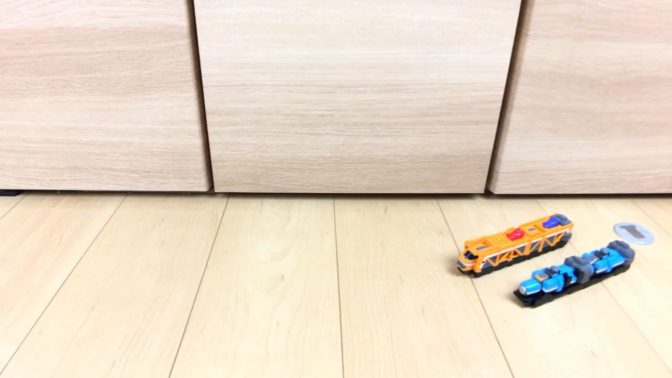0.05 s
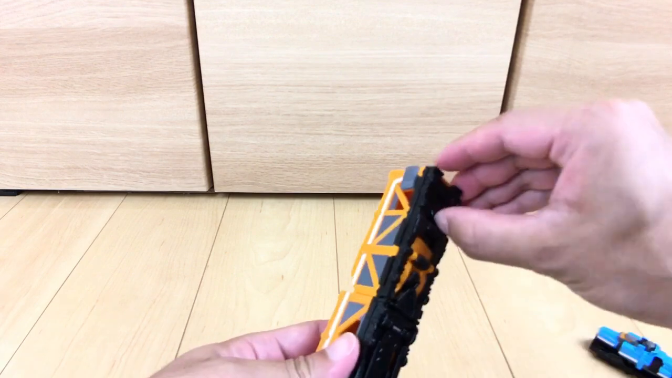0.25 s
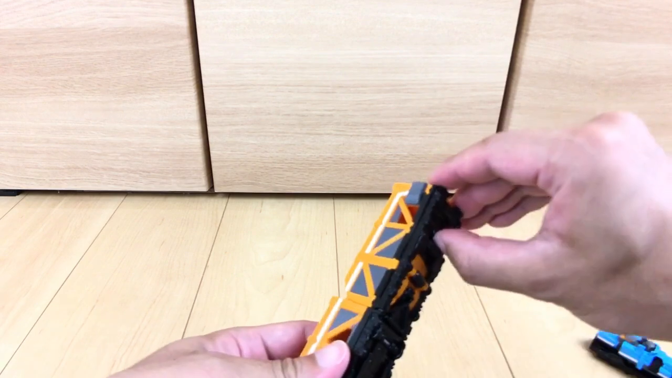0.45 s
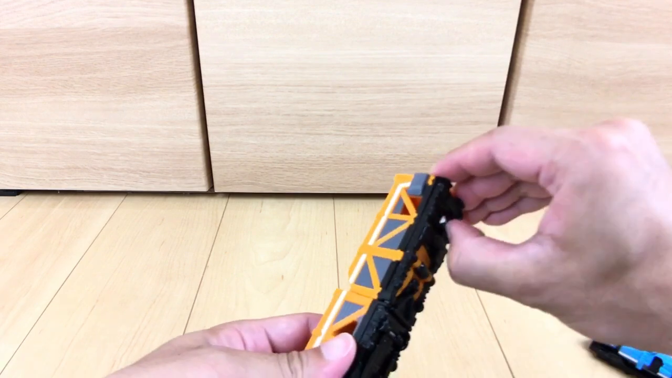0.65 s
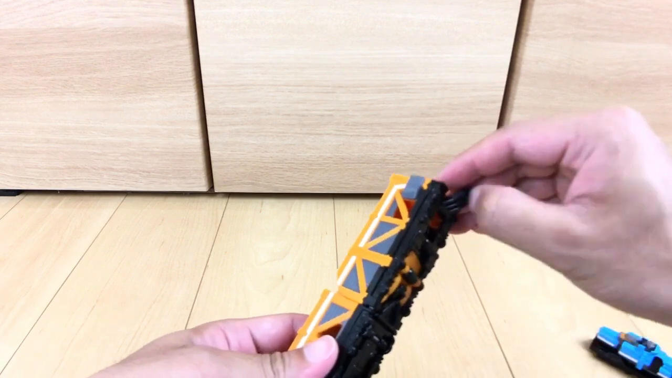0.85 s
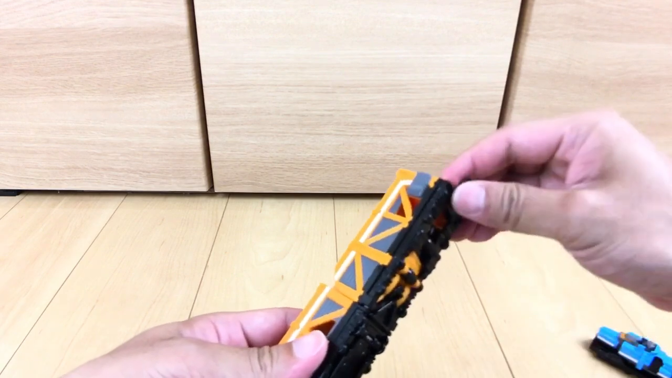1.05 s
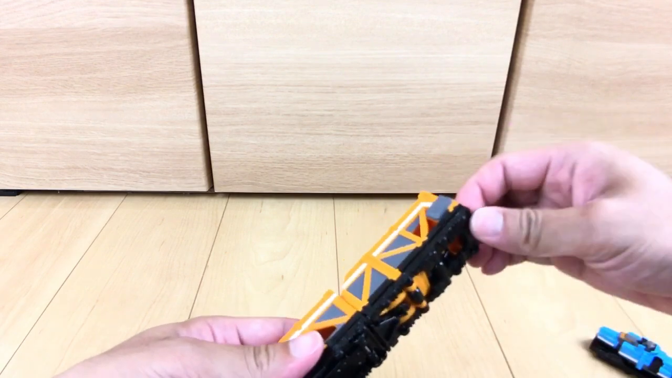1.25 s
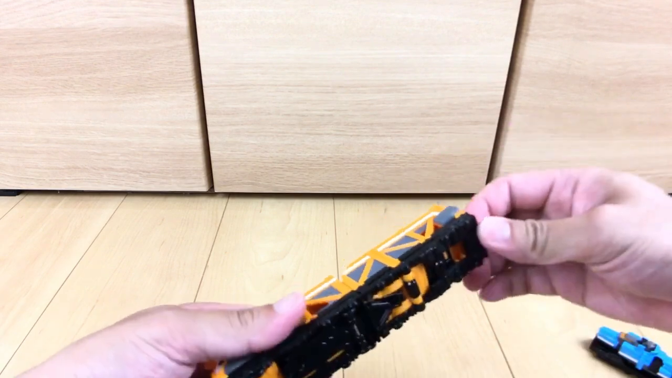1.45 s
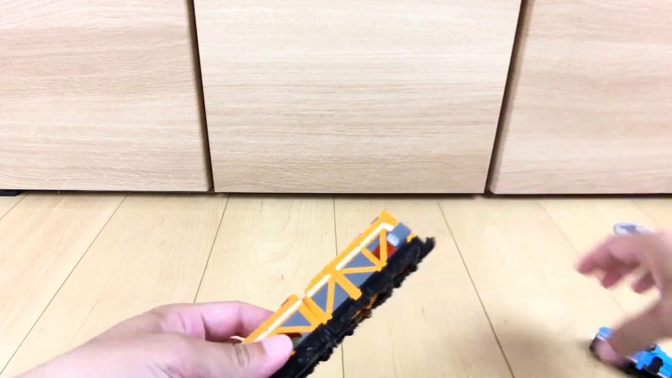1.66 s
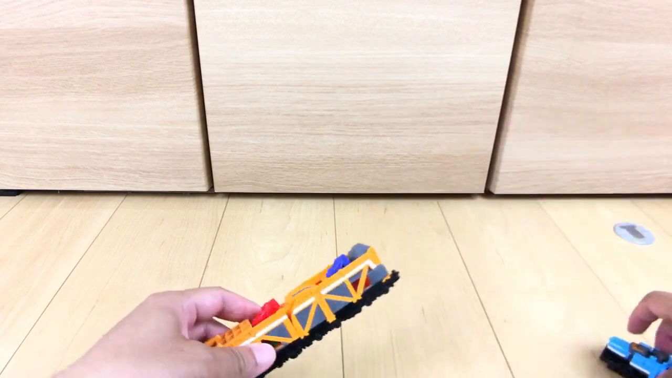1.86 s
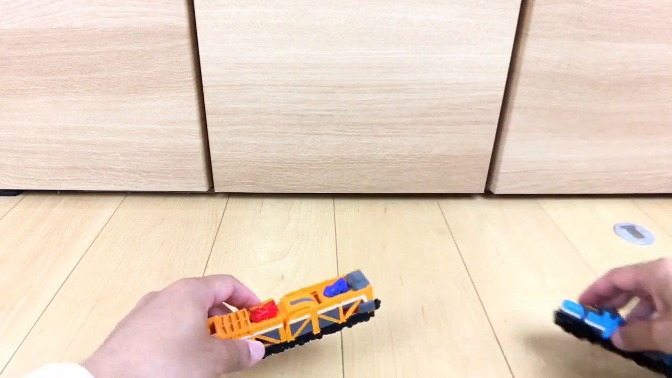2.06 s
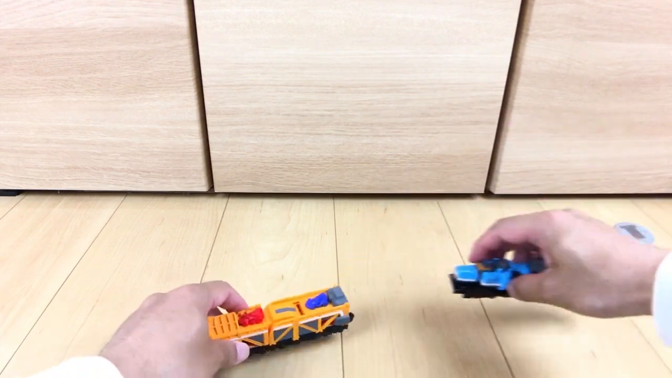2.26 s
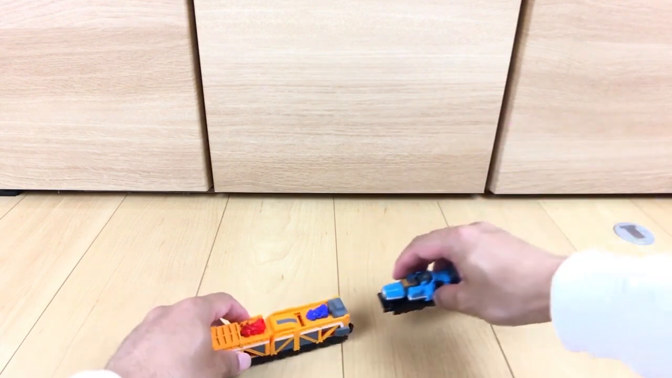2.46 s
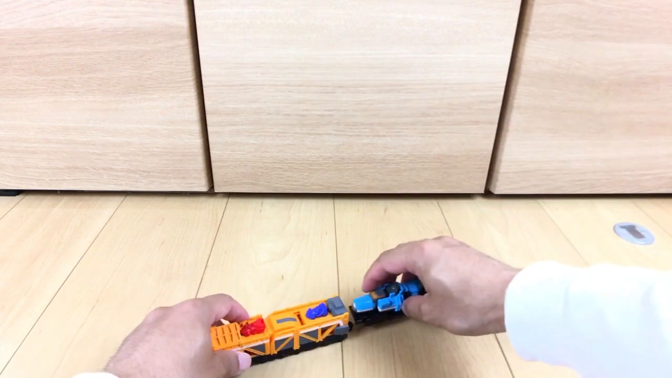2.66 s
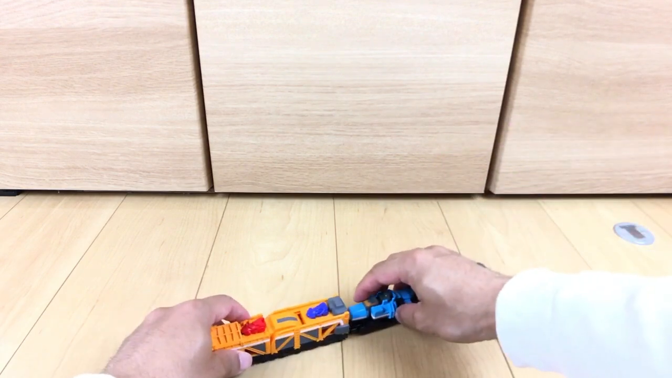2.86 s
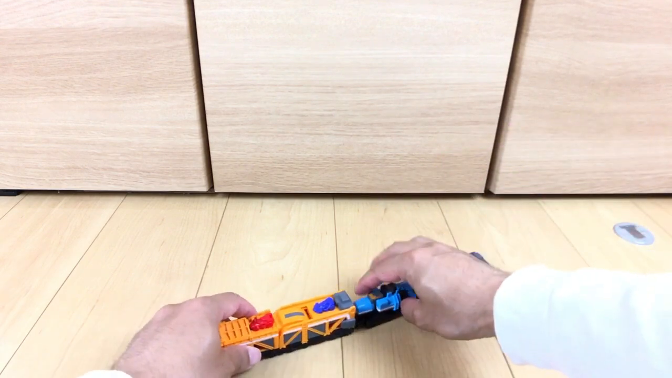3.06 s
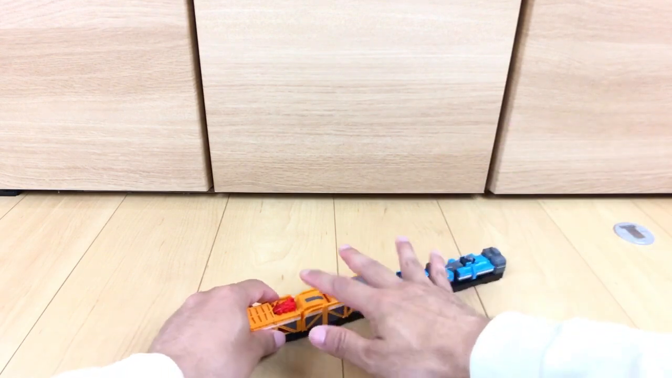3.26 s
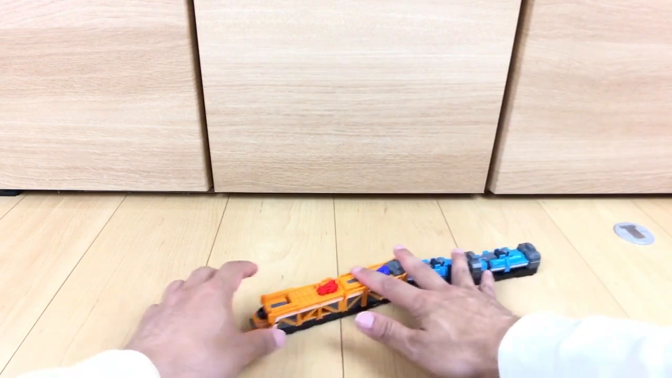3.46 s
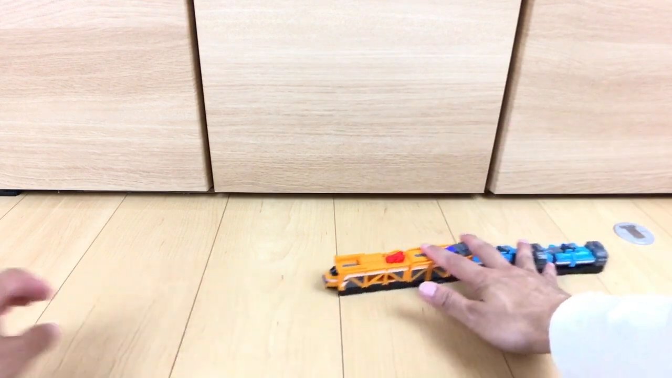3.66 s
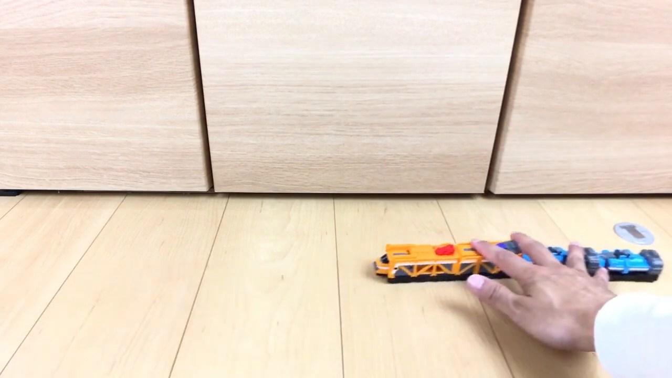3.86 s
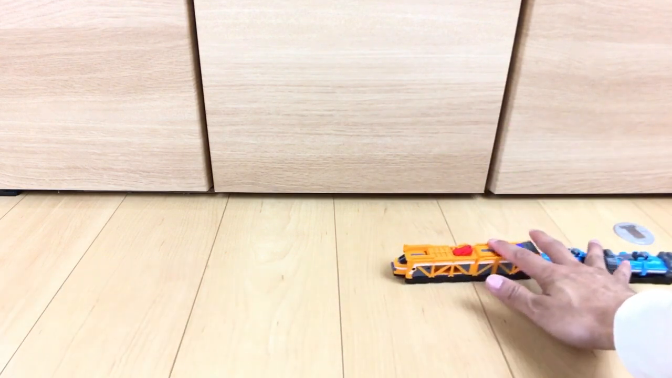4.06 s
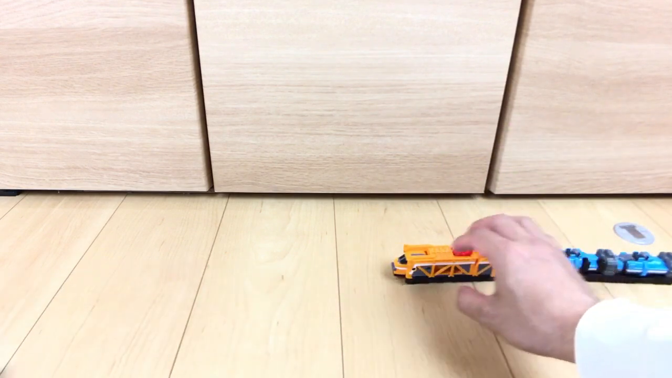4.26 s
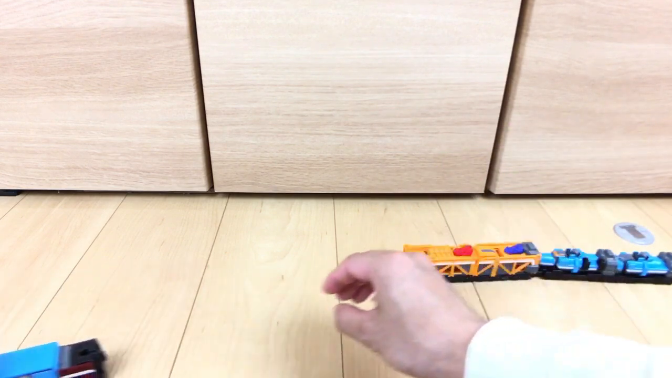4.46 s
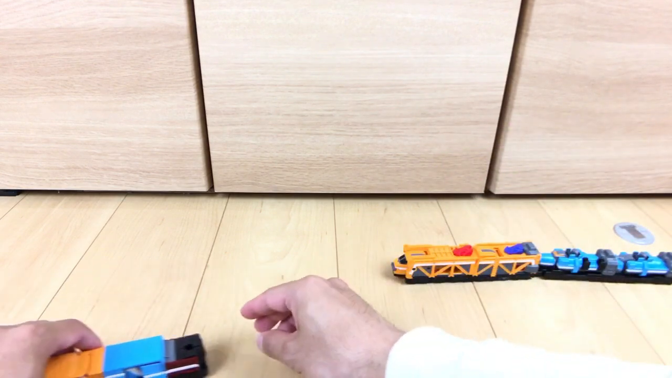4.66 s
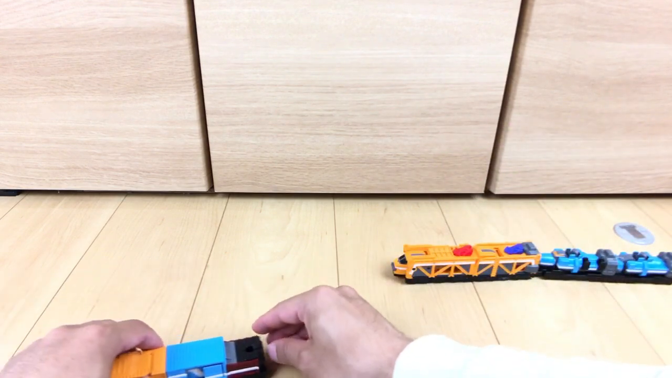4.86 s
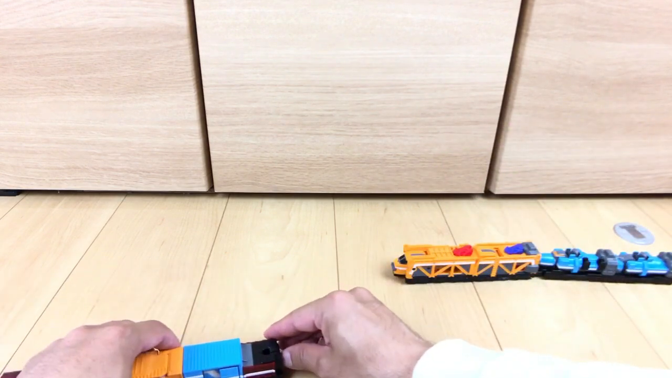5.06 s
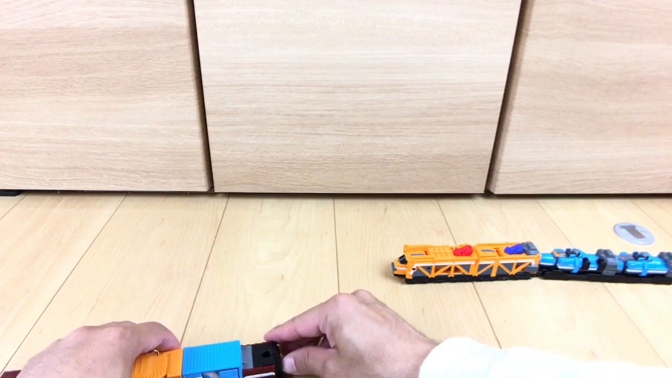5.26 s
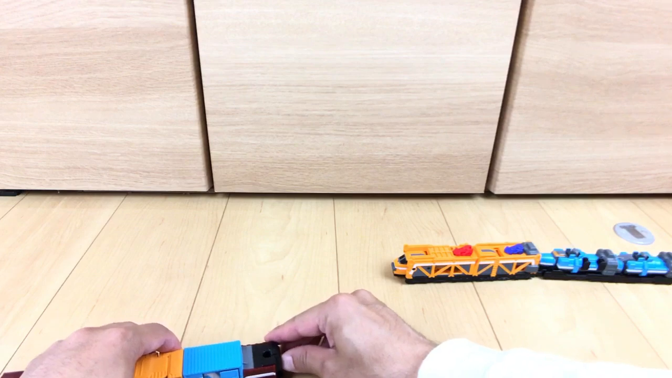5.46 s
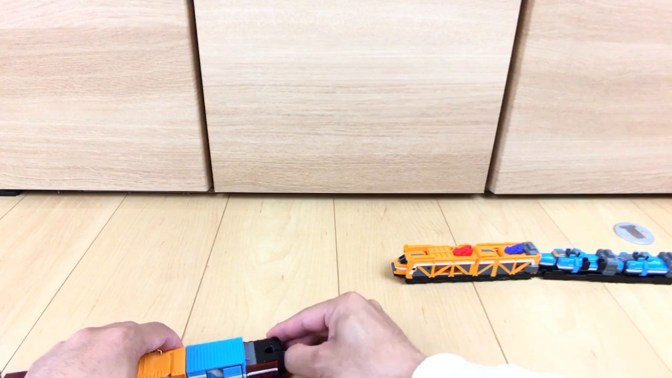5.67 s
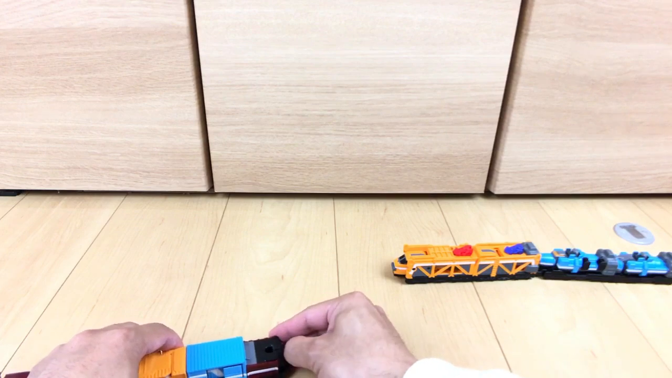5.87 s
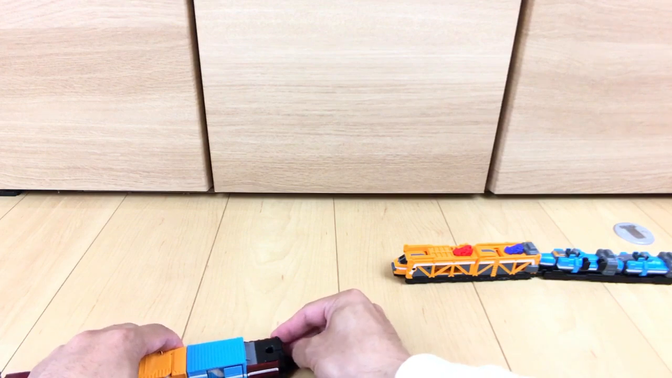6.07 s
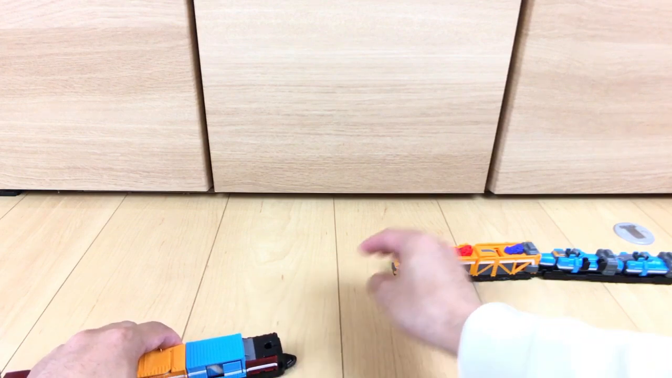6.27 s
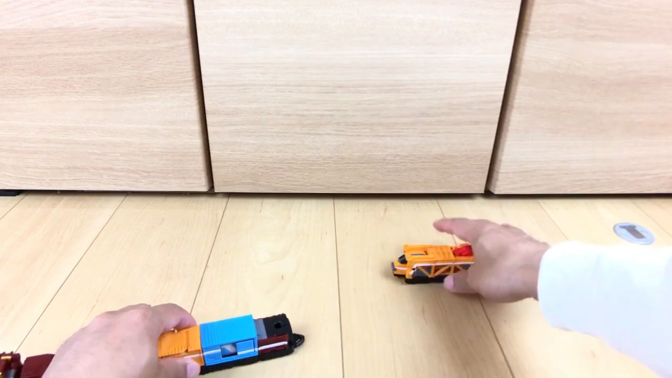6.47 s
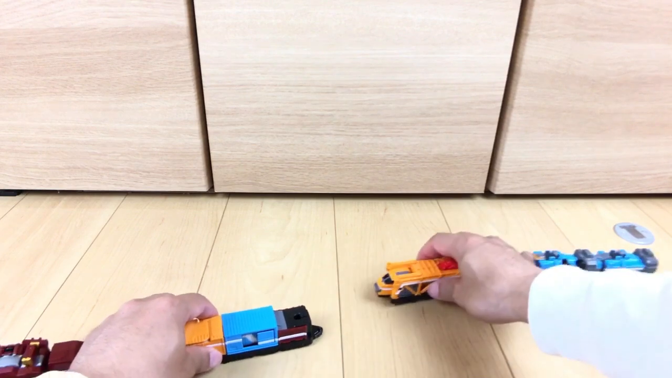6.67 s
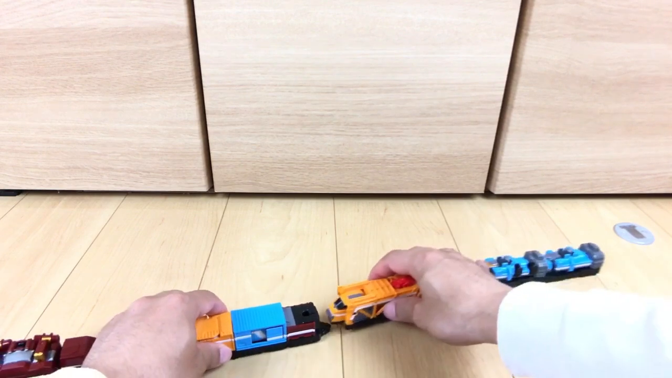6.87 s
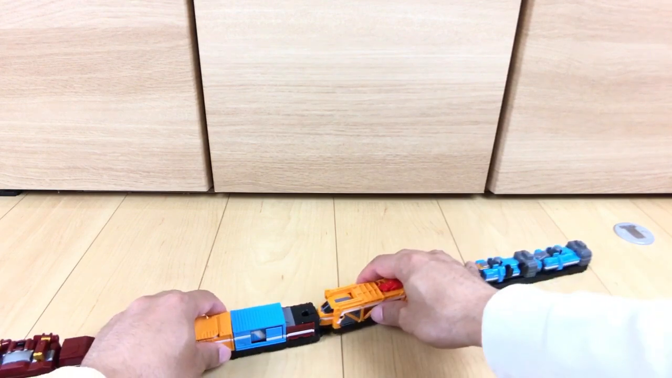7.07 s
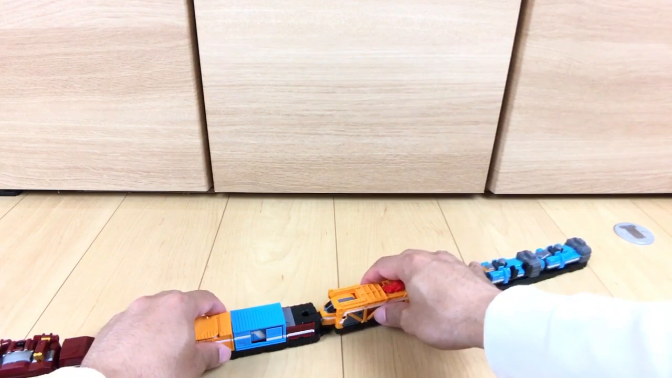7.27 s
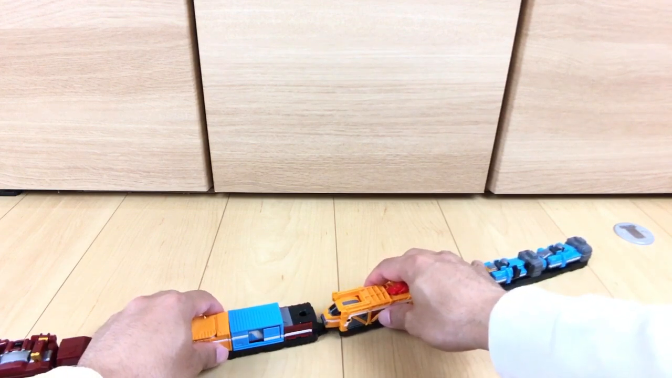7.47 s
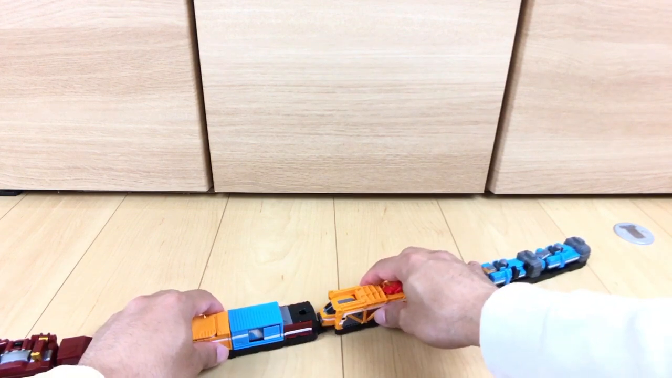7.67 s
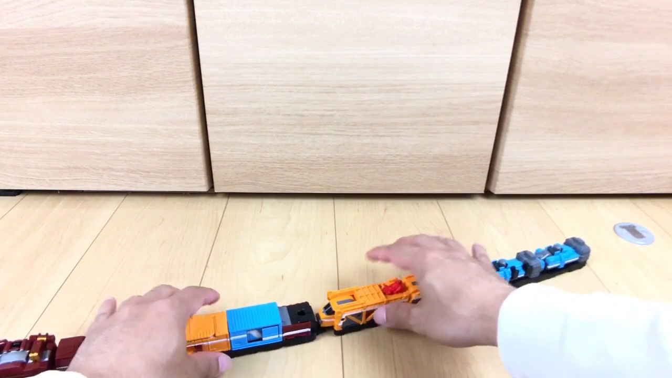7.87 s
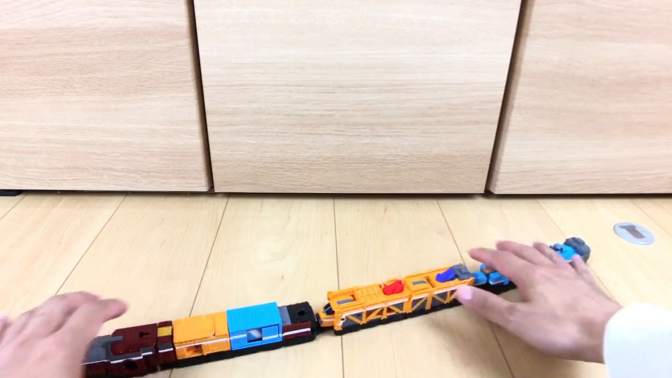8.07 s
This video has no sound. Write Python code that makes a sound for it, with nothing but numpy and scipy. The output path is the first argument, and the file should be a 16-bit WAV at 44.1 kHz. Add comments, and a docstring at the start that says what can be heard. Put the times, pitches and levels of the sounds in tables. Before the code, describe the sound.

Sharp plastic clicks and clacks of toy train cars being coupled, with hard wheels rolling and rattling over floorboards in a small room.

```python
"""A small room with a wooden floor: plastic toy train cars are handled close to a mono microphone.
A stiff coupling hook ticks as it is folded out, a car is set down and bounces, couplings snap together.
Pushed along, the hard wheels rumble in the floorboards, jolt over joints and rattle the hollow shells.
Plastic creaks under the fingers, pressed wheels judder, and the dropped engine clonks."""
import sys
import numpy as np
from scipy import signal
from scipy.fft import rfft, irfft
from scipy.io import wavfile

SR = 44100
rng = np.random.default_rng(int(sys.argv[2]) if len(sys.argv) > 2 else 0)


def generate_wav(signal):
    """Clip the signal to [-1, 1] and save it as 16-bit WAV at the path in sys.argv[1]."""
    frames = np.transpose(np.atleast_2d(signal))
    scaled = np.clip(frames, -1, 1) * 32767
    pcm = np.round(scaled).astype(np.int16)
    wavfile.write(sys.argv[1], SR, pcm)


N = 358091

# spectrum of a shell's crack: freq_hz, level_db
CRACK_SPECTRUM = [(1500, -32), (2300, -8.5), (3100, 0.5), (4400, -2), (5500, -3), (6500, -6.5), (7800, -23),
                  (10000, -17.5), (12000, -34)]
# spectrum of hard edges snapping: freq_hz, level_db
SNAP_SPECTRUM = [(7000, -48), (9000, -16.5), (10800, -11), (12000, 1), (13300, 1.5), (14500, 6.5),
                 (15600, -12), (17000, -33.5)]
# spectrum of a light wagon's rattle: freq_hz, level_db
WAGON_SPECTRUM = [(100, -65), (500, -40.5), (800, -27), (1100, -21.5), (1800, -18.5), (2500, -10.5),
                  (3400, -10), (4400, 0.5), (5100, -11), (5800, -14.5), (7800, -32.5), (10500, -30),
                  (12000, -21), (13900, -18.5), (16000, -31.5)]
# plastic shell modes: freq_hz, level_db
SHELL_MODES = [(2790, -7), (3280, -5.5), (3650, -1), (3990, -2), (4290, 1.5), (4490, 3.5), (4900, -43),
               (5430, -1), (6100, -14.5)]
# hollow body modes: freq_hz, level_db, t60_s
BODY_MODES = [(535, -28.5, .16), (581, -1.5, 0.065), (950, -14, 0.055), (1050, -9.5, 0.069),
              (1153, -10.5, 0.037)]
# mid-floor board resonances: freq_hz, width_hz, level_db
BOARD_MIDDLE = [(118.4, 50, -7), (203, 38, 1.5), (275, 98, 2), (331.3, 50, 4.5), (433, 65, -10.5),
                (624, 90, -16.5)]


def undb(db):
    """Decibels to gain."""
    return 10 ** (np.asarray(db) / 20)


def unit(x):
    """Scale to rms 1."""
    return x / np.sqrt(np.mean(x ** 2))


def colour(points, size=1024):
    """Minimum-phase impulse response from (freq_hz, level_db) points."""
    hz, db = np.transpose(points)
    gain = undb(np.interp(np.log(np.fft.rfftfreq(size, 1 / SR) + 1), np.log(hz), db))
    cepstrum = irfft(np.log(gain))
    cepstrum[1:size // 2] *= 2
    cepstrum[size // 2 + 1:] = 0
    return irfft(np.exp(rfft(cepstrum)))


def through(x, response):
    """Convolve, keeping the length."""
    return signal.oaconvolve(x, response)[:len(x)]


def butter(x, hz, kind, order=2):
    """Butterworth filter."""
    return signal.sosfilt(signal.butter(order, hz, kind, fs=SR, output="sos"), x)


def resonate(x, hz, width_hz):
    """One resonance, gain 1 at its centre."""
    return signal.lfilter(*signal.iirpeak(hz, hz / width_hz, fs=SR), x)


def fade(t, t60_s):
    """Exponential decay, 60 dB down at t60_s."""
    return np.exp(-np.log(1000) * t / t60_s)


def walk(rate_hz):
    """Random wander, rms 1."""
    knots = rng.standard_normal(N // 100)
    return unit(np.interp(np.arange(N) / SR * rate_hz, np.arange(len(knots)), knots))


def add(out, start_s, sound):
    """Mix a sound in at start_s."""
    start = max(int(start_s * SR), 0)
    part = out[start:start + len(sound)]
    part += sound[:len(part)]


def early_level(x, db, window_s=.01):
    """Scale a hit so its first window_s has rms level db."""
    return x * undb(db) / np.sqrt(np.mean(x[:int(window_s * SR)] ** 2))


def modes(t, hz, db, t60_s, detune):
    """Decaying partials; sign and strength vary with where the blow lands."""
    tuning, sign, strength = rng.standard_normal((3, len(hz), 1))
    waves = np.sin(2 * np.pi * hz[:, None] * (1 + detune * tuning) * t + np.pi * (sign > 0))
    gains = undb(db[:, None] + 2.7 * strength)
    return np.sum(gains * waves * fade(t, np.reshape(t60_s, (-1, 1))), axis=0)


def chatter(t, t60_s, spread_db):
    """Loose parts collide in a dying burst of uneven impacts."""
    noise, size = rng.standard_normal((2, len(t)))
    return noise * undb(spread_db * size) * fade(t, t60_s)


def rumble(board, bump_rate_hz=900):
    """Small wheel bumps drive the floorboard's resonances."""
    bumps = (rng.random(N) < bump_rate_hz / SR) * rng.standard_normal(N) * undb(.95 * walk(45))
    wood = sum((-1) ** k * undb(db) * resonate(bumps, hz, width_hz)
               for k, (hz, width_hz, db) in enumerate(board))
    # the board radiates little deep bass and is too heavy for treble
    return unit(butter(wood, [80, 850], "bandpass"))


def rattle(spectrum, shell_modes, rate_hz, spread_db, mode_db, wheels=5):
    """Axles tap in their bearings; each wheel rings the shell in its own way."""
    out, t = np.zeros(N), np.arange(SR // 16) / SR
    for _ in range(wheels):
        size = undb(spread_db * np.minimum(rng.exponential(size=N), 4))
        load = undb(2.4 * walk(22))  # the hand's weight shifts between wheels
        taps = (rng.random(N) < rate_hz / wheels / SR) * size * load
        crack = through(chatter(t, t60_s=.03, spread_db=1.5), colour(spectrum))
        ring = modes(t, *np.transpose(shell_modes), t60_s=.045, detune=.011)
        out += through(taps, unit(crack) + undb(mode_db) * unit(ring))
    return unit(out)


def engine_rattle():
    """The heavier engine rattles densely, with a fuller midrange."""
    # tap spectrum and shell modes: freq_hz, level_db
    spectrum = [(100, -58), (450, -19), (750, -9), (1250, -9.5), (1700, -13), (2150, -12), (3500, -3),
                (4600, 0), (5500, -8.5), (7800, -25.5), (10500, -25), (12000, -16.5), (13700, -16.5),
                (16000, -28.5)]
    shell_modes = [(2104, 0.5), (2220, -10), (2820, 1), (4300, 2.5), (4490, -0.5), (5200, 1.5)]
    return rattle(spectrum, shell_modes, rate_hz=1200, spread_db=2, mode_db=-7) * undb(.46 * walk(70))


def edge_ticks(rate_hz=90):
    """Loose hard edges tick together, sparse and bright."""
    t = np.arange(SR // 30) / SR
    size = undb(4 * np.minimum(rng.exponential(size=N), 3))
    tick = through(chatter(t, t60_s=.014, spread_db=5), colour(SNAP_SPECTRUM))
    return unit(through((rng.random(N) < rate_hz / SR) * size, tick))


def roll(push, board, shell, ticks, rumble_trim_db, rattle_trim_db, tick_trim_db):
    """Rumble and rattle swell and die with one push; edge ticks stand out when it is brisk."""
    time_s, *levels_db = np.transpose(push)
    span = np.arange(max(int(time_s[0] * SR), 0), min(int(time_s[-1] * SR), N))
    rumble_db, rattle_db = (np.interp(span / SR, time_s, db) for db in levels_db)
    pivot_db, tick_db_per_db = -29.5, 1.5
    tick_db = pivot_db + tick_db_per_db * (rattle_db - pivot_db)
    out = np.zeros(N)
    out[span] = (undb(rumble_db + rumble_trim_db) * rumble(board)[span]
                 + undb(rattle_db + rattle_trim_db) * shell[span]
                 + undb(tick_db + tick_trim_db) * ticks[span])
    return out


def opening_roll(shell, ticks):
    """A brief stretch of rolling wheels, cut off abruptly with no echo."""
    # push envelope: time_s, rumble_db, rattle_db
    push = [(0.0, -31.5, -34.5), (0.106, -32, -52), (0.118, -36, -43.5), (0.145, -41, -49)]
    # board resonances: freq_hz, width_hz, level_db
    board = [(185, 32, 5), (315, 140, -5.5), (480, 74, -12.5), (700, 320, -15)]
    return roll(push, board, shell, ticks, rumble_trim_db=1, rattle_trim_db=2.5, tick_trim_db=-22)


def room_air(level_db=-54.5):
    """The quiet room: steady noise, mostly bass."""
    # noise spectrum: freq_hz, level_db
    spectrum = [(20, -1), (35, -6.5), (70, 2.5), (100, -6.5), (140, -6.5), (200, -15), (400, -27),
                (700, -31.5), (1800, -33.5), (4400, -33), (8000, -42.5), (11000, -38), (14000, -32.5),
                (17000, -45)]
    return undb(level_db) * unit(through(rng.standard_normal(N), colour(spectrum, size=8192)))


def shell_hit(shell_db, knock_db, snap_db, pitch_hz, t60_s, broad_db, width_hz=860, contact_s=.00033):
    """A contact cracks and rings the shell, knocks the chassis and snaps on the hard edges."""
    # hollow chassis knock: freq_hz, level_db
    knock_spectrum = [(300, -34), (700, -6), (1200, 1.5), (1800, 1.5), (2300, 7), (3200, -12)]
    t = np.arange(SR // 6) / SR
    contact = 1 - np.exp(-t / contact_s)
    crack = through(contact * chatter(t, .9 * t60_s, spread_db=2.5), colour(CRACK_SPECTRUM))
    damped_t60_s = min(.7 * t60_s, .025)  # fingers damp the modes
    ring = contact * modes(t, *np.transpose(SHELL_MODES), damped_t60_s, detune=.04)
    shell = unit(crack) + undb(-3) * unit(ring)
    # the touched part favours its own pitch
    shell = resonate(shell, pitch_hz, width_hz) + undb(broad_db) * shell
    knock = through(contact * chatter(t, t60_s, spread_db=3), colour(knock_spectrum))
    snap = through(contact * chatter(t, t60_s, spread_db=10), colour(SNAP_SPECTRUM))
    return early_level(shell, shell_db) + early_level(knock, knock_db) + early_level(snap, snap_db)


def hook(t60_s=.024, ratchet_start_s=.5716, notch_rate_hz=95, notches=6):
    """The stiff hook ticks out on a car held in the air: no thump, hardly any knock."""
    # hinge ticks: start_s, shell_db, snap_db, pitch_hz
    ticks = [(0.2, -47, -78, 3770), (0.402, -50.5, -78, 4100), (0.485, -29, -35.5, 3850),
             (0.5268, -36, -46, 4070), (0.5453, -28, -40, 4670), (0.561, -26, -37, 4300),
             (0.5803, -26, -29, 4000), (0.6434, -29.5, -42, 3400), (0.653, -37, -31.5, 4590),
             (0.6758, -37.5, -42, 4320), (0.703, -40.5, -50, 4360), (0.7106, -43, -64, 3870),
             (0.8089, -34, -51, 3600), (0.949, -36.5, -53, 4000), (0.964, -42.5, -48, 4030),
             (1.0192, -43, -71, 3700), (1.032, -38.5, -48, 3910), (1.046, -33, -48, 3900),
             (1.0498, -31.5, -34, 4300), (1.1898, -45, -70, 4000), (1.2181, -35.5, -49.5, 3700),
             (1.259, -35.5, -46, 4400), (1.3217, -41, -58, 2680), (1.3694, -42, -57, 4100),
             (1.422, -45, -58, 4320), (1.4573, -29, -38.5, 4400), (1.478, -47, -51, 4430)]
    out = np.zeros(N)
    for start_s, db, snap_db, pitch_hz in ticks:
        add(out, start_s, shell_hit(db, db - 30, snap_db, pitch_hz, t60_s, broad_db=-11.5, width_hz=620))
    for k in range(notches):  # the hinge slips notch by notch
        db = -32 - k
        notch = shell_hit(db, knock_db=db - 30, snap_db=db - 9, pitch_hz=4150, t60_s=t60_s, broad_db=-11)
        add(out, ratchet_start_s + k / notch_rate_hz, notch)
    return out


def room(x, wet_db=-14, t60_s=.23, shelf_hz=7500, paths=4):
    """Direct sound plus a short, dense echo off floor and cupboard doors, shifting as the toys move."""
    t = np.arange(SR // 2) / SR
    places = np.array([walk(7) for _ in range(paths)])
    echo = 0
    for share in places / np.sqrt(np.sum(places ** 2, axis=0)):
        noise = rng.standard_normal(len(t))
        softened = butter(noise, shelf_hz, "lowpass") + .6 * butter(noise, shelf_hz, "highpass")
        tail = softened * fade(t, t60_s) * (t > .006)
        echo += through(x * share, tail / np.sqrt(np.sum(tail ** 2)))
    return x + undb(wet_db) * echo


def scrapes(slip_rate_hz=900):
    """Plastic sticks and slips under the fingers: short runs of tiny clicks into the shell."""
    # rubs: start_s, length_s, level_db, pitch_hz
    rubs = [(.469, .0067, -48, 4300), (0.831, .014, -50, 3300), (0.944, .0065, -43, 3780),
            (1.433, 0.024, -52.5, 4200), (5.236, .012, -58, 3950), (5.419, 0.012, -49, 4500),
            (5.655, 0.024, -57.5, 2320), (6.216, .03, -59, 3400), (5.913, .007, -52, 4500),
            (5.957, 0.013, -40, 4320), (7.087, 0.021, -53, 3600), (7.137, 0.029, -53.5, 4000),
            (7.482, 0.018, -53, 4200), (7.559, 0.029, -44, 5100), (7.75, .019, -53, 3880)]
    out, t = np.zeros(N), np.arange(SR // 12) / SR
    crack = colour(CRACK_SPECTRUM)
    for start_s, length_s, db, pitch_hz in rubs:
        slips = rng.standard_normal(len(t)) * (.09 + (rng.random(len(t)) < slip_rate_hz / SR))
        rub = through(slips * np.sin(np.pi * np.minimum(t / length_s, 1)), crack)
        creak = resonate(rub, pitch_hz, width_hz=600) + undb(-9) * rub
        add(out, start_s, early_level(creak, db, length_s))
    return out


def wagon_rattle():
    """A light wagon rattles thinly and unevenly."""
    return rattle(WAGON_SPECTRUM, SHELL_MODES, rate_hz=550, spread_db=2, mode_db=-5) * undb(1.56 * walk(60))


def turn(shell, ticks):
    """The wheels roll briefly as a car is turned."""
    # push envelope: time_s, rumble_db, rattle_db
    push = [(1.7, -75, -91), (1.736, -41, -48.5), (1.8, -44, -46), (1.85, -37, -35.5), (1.93, -45, -49.5),
            (1.946, -33, -32), (2.058, -69, -60), (2.07, -70, -68)]
    return roll(push, BOARD_MIDDLE, shell, ticks, rumble_trim_db=-4, rattle_trim_db=-3, tick_trim_db=-8)


def thump(db, rise_s=.0036):
    """The struck floorboard is heavy and takes milliseconds to get moving."""
    # board modes: freq_hz, level_db, t60_s
    board_modes = [(127.7, -8, 0.16), (159.6, -2.5, 0.13), (203.5, -2, 0.18), (253.4, -7.5, 0.11),
                   (302.7, 1.5, 0.1), (342, -7.5, 0.11), (443, -21, 0.11), (528, -15, 0.11),
                   (597.6, -10, 0.077), (695, -20.5, 0.079)]
    t = np.arange(SR // 6) / SR
    board = modes(t, *np.transpose(board_modes), detune=.045) * (1 - np.exp(-t / rise_s))
    return early_level(board, db, window_s=.03)


def clacks():
    """Cars and couplings meet: the shell rings and the wheels pass the blow to the board."""
    # collisions: start_s, shell_db, thump_db, knock_db, snap_db, pitch_hz
    collisions = [(1.7366, -39.5, -45, -68, -44, 4670), (2.7344, -18, -29, -31.5, -16, 4270),
                  (2.795, -17, -38, -37, -32.5, 4500), (2.919, -36.5, -46, -44.5, -54, 3900),
                  (3.0408, -32.5, -37.5, -49, -43, 3940), (5.2038, -45, -49.5, -51.5, -61, 4450),
                  (5.3352, -46.5, -57, -53.5, -56, 4180), (5.4289, -37, -49, -42, -43, 4500),
                  (5.432, -24.5, -23.5, -30.5, -28, 4800), (5.5143, -37, -69, -58, -40, 5030),
                  (5.5371, -43.5, -50, -55, -45, 4440), (5.6098, -32.5, -47.5, -50, -38, 4960),
                  (5.739, -44, -47, -51.5, -57, 4470), (5.7649, -39, -41.5, -45, -38, 4130),
                  (5.7732, -15.5, -32.5, -29.5, -22, 4800), (5.919, -34.5, -41.5, -45, -41, 5030),
                  (5.9669, -22, -28, -34.5, -29, 4640), (6.0235, -39, -39, -48, -49, 4700),
                  (6.0402, -30, -36.5, -40.5, -37, 4400), (6.0538, -32.5, -42.5, -43, -38, 4150),
                  (6.109, -47, -47, -51, -56, 4760), (7.0058, -39.5, -50, -46.5, -59, 3450),
                  (7.123, -43.5, -58, -55, -76, 3540), (7.1765, -41.5, -42.5, -50.5, -62, 4000),
                  (7.212, -45, -52, -55, -74, 3700), (7.348, -43, -40.5, -57, -73, 4400),
                  (7.4313, -40, -39.5, -55, -50.5, 4420), (7.569, -35, -37.5, -49, -52, 3880),
                  (7.5799, -22.5, -34, -40, -36, 6130), (7.5853, -22, -28, -36, -35, 3980),
                  (7.5945, -15, -32, -31.5, -38, 4460), (7.6017, -25, -30.5, -50, -34, 4230),
                  (8.0982, -33, -36, -47, -35, 4370)]
    out = np.zeros(N)
    for start_s, shell_db, thump_db, knock_db, snap_db, pitch_hz in collisions:
        hit = shell_hit(shell_db, knock_db, snap_db, pitch_hz, t60_s=.036, broad_db=-12.5)
        add(out, start_s, hit + thump(thump_db))
    return out


def jolts():
    """A wheel drops into a joint; the harder it thumps the board, the more the chassis knocks."""
    # joint crossings: start_s, shell_db, thump_db
    joints = [(1.8434, -39, -49), (3.1711, -31, -37.5), (3.3357, -27, -43), (3.3445, -25.5, -42),
              (3.4826, -19.5, -50), (3.4963, -21.5, -43), (3.507, -20.5, -49), (3.613, -20.5, -46),
              (3.7308, -23.5, -40), (3.771, -27, -38.5), (3.8053, -26.5, -49), (3.8426, -30.5, -43.5),
              (3.9937, -32.5, -49), (4.2032, -31, -28), (4.3051, -29, -32), (4.3962, -26, -34),
              (4.9911, -38.5, -47), (6.561, -26, -35), (6.5697, -22, -36), (6.589, -28.5, -37),
              (6.6514, -32.5, -35.5), (6.7843, -26.5, -39.5), (6.8843, -29, -37.5)]
    out = np.zeros(N)
    for start_s, db, thump_db in joints:
        hit = shell_hit(db, knock_db=thump_db - 9, snap_db=db - 11.5, pitch_hz=4400,
                        t60_s=.07, broad_db=-19)
        add(out, start_s, hit + thump(thump_db))
    return out


def landings(contacts=6, flight_s=.0225, flight_ratio=.7, loss_db=4, snap_loss_db=6):
    """A car set down bounces; each bounce is shorter, weaker and duller than the last."""
    # first contacts: start_s, shell_db, body_db, snap_db
    touchdowns = [(1.9424, -31.5, -51, -46), (2.4039, -20, -39.5, -20), (2.7107, -26, -58, -34.5)]
    out, t = np.zeros(N), np.arange(SR // 6) / SR
    for start_s, shell_db, body_db, snap_db in touchdowns:
        for k in range(contacts):
            db = shell_db - k * loss_db
            hit = shell_hit(db, knock_db=db - 35.5, snap_db=snap_db - k * snap_loss_db,
                            pitch_hz=4200, t60_s=.031, broad_db=-3)
            body = modes(t, *np.transpose(BODY_MODES), detune=.22)
            body = early_level(body, body_db - k * loss_db, window_s=.015)
            add(out, start_s, hit + body + thump(db - 9.5))
            start_s += flight_s * flight_ratio ** k
    return out


def roll_away(shell, ticks):
    """A long, brisk push sends a car away over the boards."""
    # push envelope: time_s, rumble_db, rattle_db
    push = [(2.85, -55, -47), (3.062, -39.5, -40), (3.148, -43, -43), (3.162, -35.5, -37),
            (3.278, -39.5, -41.5), (3.354, -38.5, -30.5), (3.402, -21.5, -24.5), (3.446, -32, -31.5),
            (3.472, -24.5, -24.5), (3.78, -28.5, -28), (3.856, -40.5, -41.5), (4.06, -42, -50.5)]
    # board resonances: freq_hz, width_hz, level_db
    board = [(151.4, 42, -9), (234, 47.7, -1.5), (307.6, 38.6, -2), (486, 64, -21.5), (602, 42, -19.5)]
    return roll(push, board, shell, ticks, rumble_trim_db=-2.5, rattle_trim_db=-1.73, tick_trim_db=-21.5)


def judder(jitter=.05, flutter_db=2, sag=.17, ramp_s=.018):
    """Pressed wheels shudder on the board; the uneven hum sags in pitch as they free themselves."""
    # shudders: start_s, length_s, rate_hz, level_db
    shudders = [(3.389, 0.18, 289.2, -27), (3.574, 0.1, 299.3, -22), (3.705, 0.091, 250.5, -26)]
    out = np.zeros(N)
    waver, flutter = 1 + jitter * walk(90), undb(flutter_db * walk(60))
    for start_s, length_s, rate_hz, db in shudders:
        t = np.arange(int(length_s * SR)) / SR
        span = int(start_s * SR) + np.arange(len(t))
        pitch_hz = rate_hz * (1 - sag * (t / length_s) ** 3) * waver[span]
        phase = 2 * np.pi * np.cumsum(pitch_hz) / SR
        hum = unit(np.sin(phase) + undb(-26) * np.sin(2 * phase))
        envelope = np.minimum(np.minimum(t, length_s - t) / ramp_s, 1)
        add(out, start_s, undb(db) * flutter[span] * envelope * hum)
    return out


def engine_roll(shell, ticks):
    """The pushed engine draws a deeper rumble from the boards."""
    # push envelope: time_s, rumble_db, rattle_db
    push = [(4.06, -42, -51.5), (4.112, -38, -41), (4.144, -27, -36), (4.346, -28.5, -31),
            (4.396, -26.5, -26), (4.424, -26, -32.5), (4.5, -29.5, -26), (4.546, -32.5, -33),
            (4.652, -27.5, -31.5), (4.824, -33.5, -36.5), (4.93, -30.5, -37), (5.1, -69, -70.5)]
    # board resonances: freq_hz, width_hz, level_db
    board = [(72, 18, -12), (146, 30.6, 0.5), (199, 46, -1), (300, 62, -5.5), (366.4, 66, -7),
             (633, 35, -13.5)]
    return roll(push, board, shell, ticks, rumble_trim_db=-.96, rattle_trim_db=.53, tick_trim_db=-12.5)


def engine_drop(start_s=5.4335, level_db=-33):
    """Dropped on its wheels, the engine's hollow body gives a short, low clonk."""
    out, t = np.zeros(N), np.arange(SR // 4) / SR
    body = modes(t, *np.transpose(BODY_MODES), detune=.004)
    add(out, start_s, early_level(body, level_db, window_s=.036))
    return out


def gripped_rattle():
    """A wagon gripped by its sides rattles with lower modes."""
    # gripped shell modes: freq_hz, level_db
    shell_modes = [(850, -14.5), (1900, -9), (2100, -9.5), (2560, -3.5), (2820, -4.5), (4270, -4.5),
                   (4490, -2), (4650, -4.5)]
    shell = rattle(WAGON_SPECTRUM, shell_modes, rate_hz=640, spread_db=3, mode_db=-3.5)
    return shell * undb(1.5 * walk(50))


def roll_together(wagon, engine, ticks):
    """Wagon and engine are pushed towards each other."""
    # push envelope: time_s, rumble_db, rattle_db
    push = [(6.17, -62, -67), (6.36, -44.5, -52), (6.444, -35.5, -36), (6.49, -41, -48.5),
            (6.576, -31, -28.5), (6.638, -36, -42), (6.65, -35, -33), (6.92, -38, -39), (6.978, -45, -60),
            (7.018, -48, -47.5), (7.072, -51.5, -69), (7.12, -43, -49)]
    both = wagon + undb(-6) * engine
    return roll(push, BOARD_MIDDLE, both, ticks, rumble_trim_db=-1.5, rattle_trim_db=-2, tick_trim_db=-14)


def nudges(shell, attack_s=.029, t60_s=.33):
    """Short shoves line up the couplings: rumble and rattle jump, then die as the cars coast."""
    # shoves: peak_s, rumble_db, rattle_db
    shoves = [(7.2, -45.5, -54), (7.338, -38.5, -48), (7.48, -44, -57), (7.62, -41, -40.5),
              (7.72, -53, -66), (7.79, -56, -63), (8.11, -39, -35)]
    out, t = np.zeros(N), np.arange(N) / SR
    floor = rumble(BOARD_MIDDLE)
    for peak_s, rumble_db, rattle_db in shoves:
        motion = np.clip(1 + (t - peak_s) / attack_s, 0, 1) * fade(np.maximum(t - peak_s, 0), t60_s)
        out += motion * (undb(rumble_db) * floor + undb(rattle_db) * shell)
    return out


def scene():
    """Rolling and handling in the room, over its quiet air."""
    wagon, gripped, engine = wagon_rattle(), gripped_rattle(), engine_rattle()
    ticks = edge_ticks()
    opening = opening_roll(engine, ticks)
    toys = landings() + clacks() + jolts() + engine_drop() + scrapes() + judder() + nudges(gripped)
    toys += turn(wagon, ticks) + roll_away(wagon, ticks)
    toys += engine_roll(engine, ticks) + roll_together(gripped, engine, ticks)
    air = room_air()
    near, room_share = hook(), .67  # held close to the microphone: less echo
    mono = opening + room(toys + room_share * near) + (1 - room_share) * near + air
    return np.array([mono, mono])


def record(dry, bottom_hz=30, top_hz=16100, ceiling=.9):
    """Filters drop the deepest bass and the top treble; a soft limiter rounds the loudest clacks."""
    thinned = butter(dry, bottom_hz, "highpass", order=3)
    rounded = thinned / (1 + (thinned / ceiling) ** 4) ** .25
    return signal.sosfilt(signal.ellip(8, .2, 80, top_hz, fs=SR, output="sos"), rounded)


dry = scene()
out = record(dry)
generate_wav(out)
```